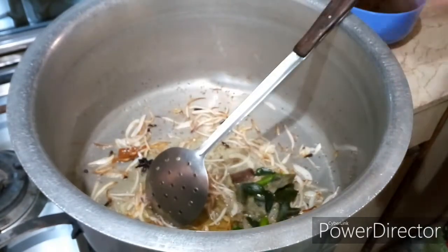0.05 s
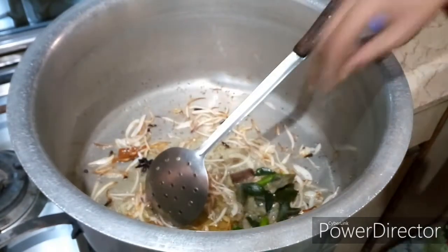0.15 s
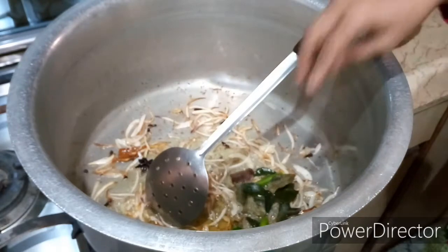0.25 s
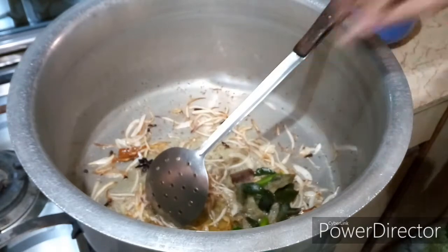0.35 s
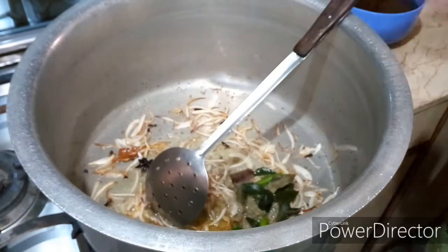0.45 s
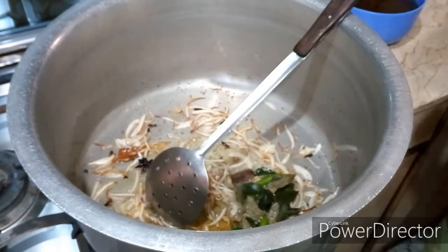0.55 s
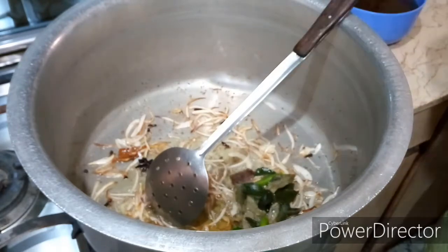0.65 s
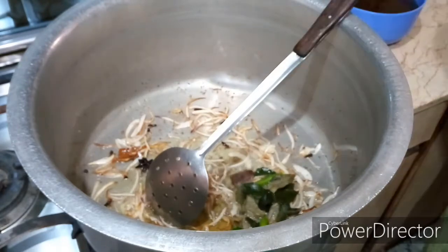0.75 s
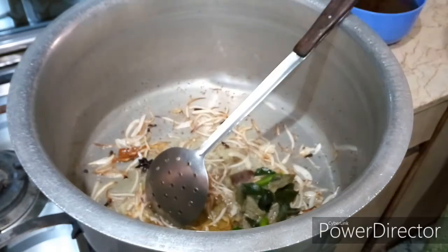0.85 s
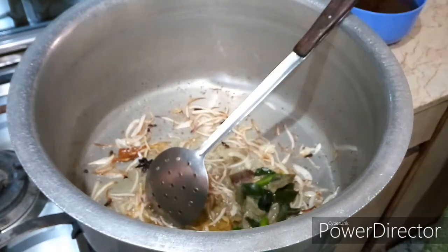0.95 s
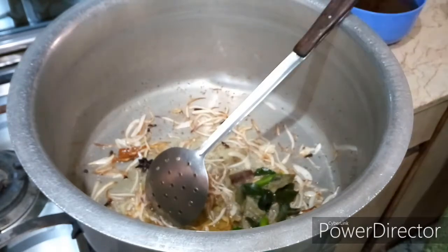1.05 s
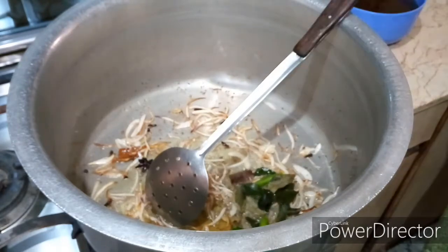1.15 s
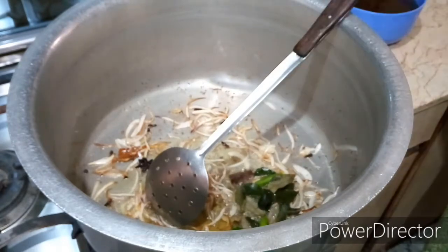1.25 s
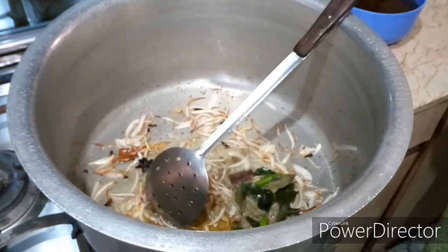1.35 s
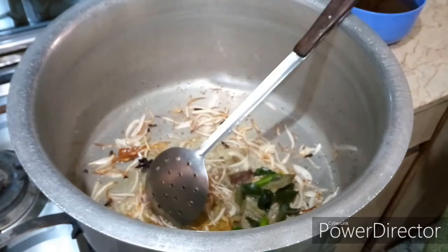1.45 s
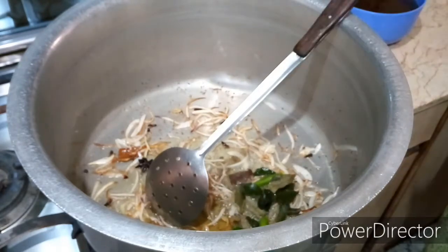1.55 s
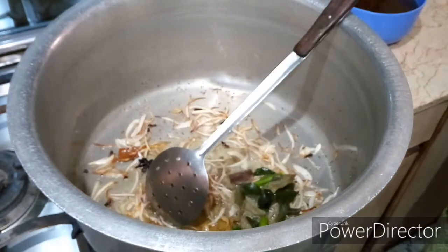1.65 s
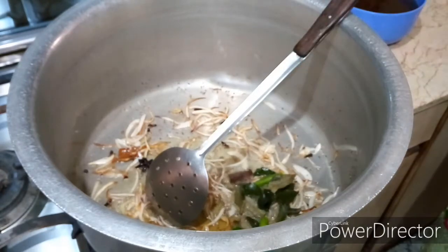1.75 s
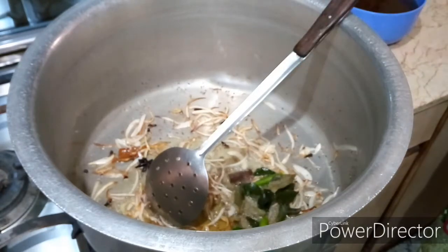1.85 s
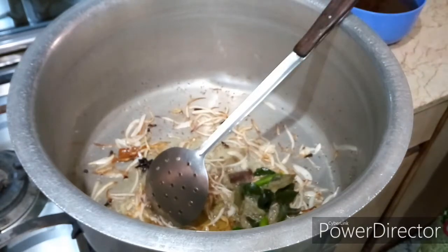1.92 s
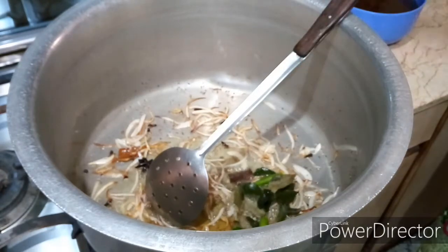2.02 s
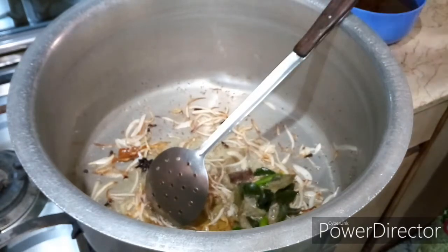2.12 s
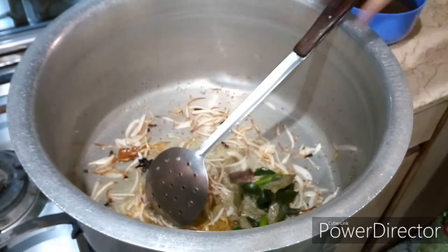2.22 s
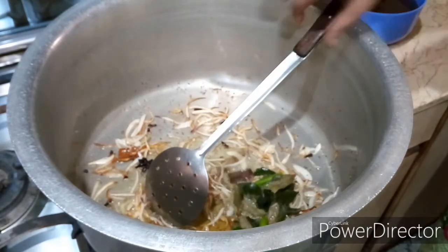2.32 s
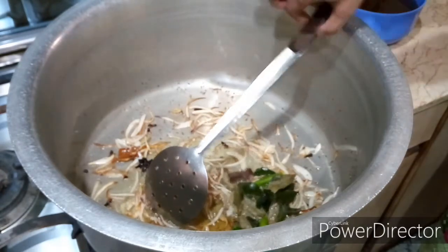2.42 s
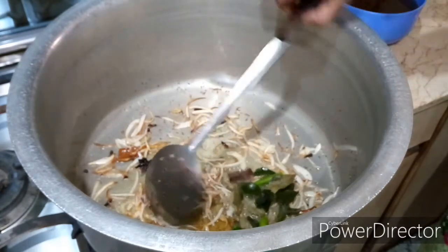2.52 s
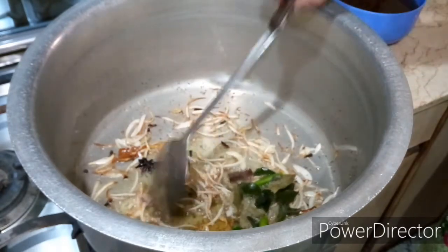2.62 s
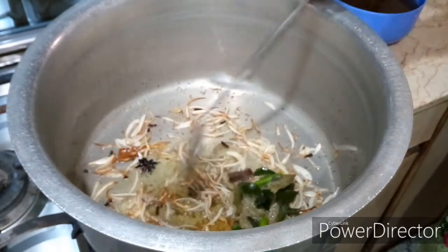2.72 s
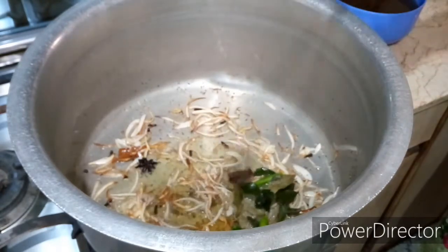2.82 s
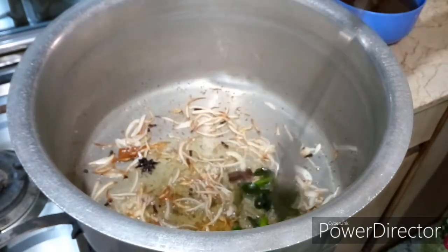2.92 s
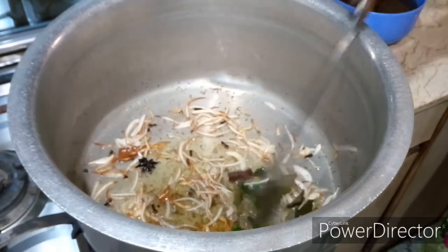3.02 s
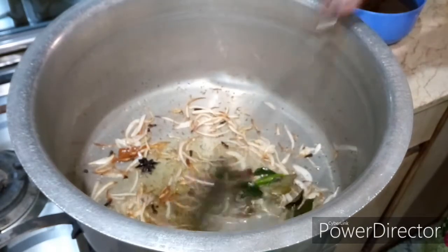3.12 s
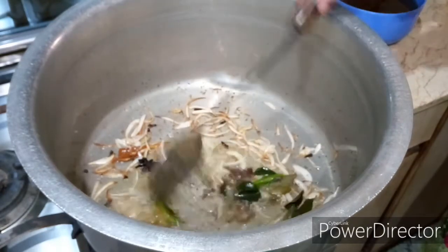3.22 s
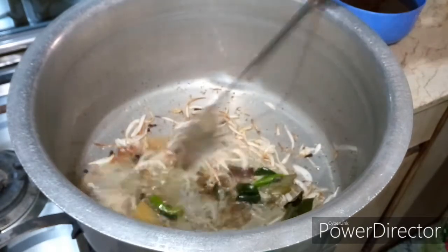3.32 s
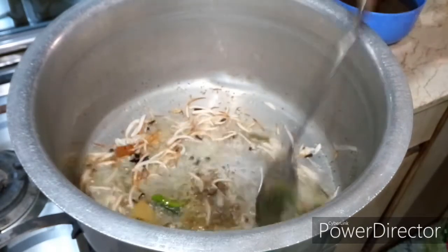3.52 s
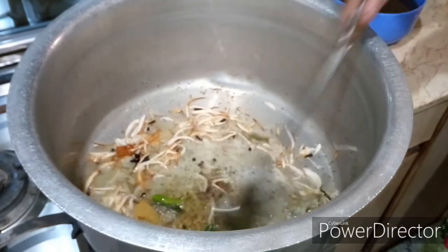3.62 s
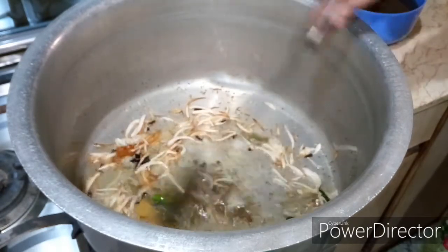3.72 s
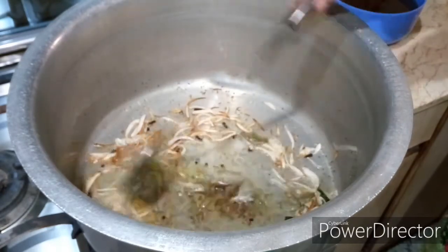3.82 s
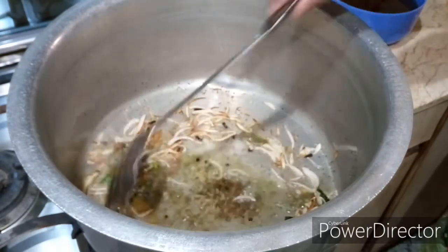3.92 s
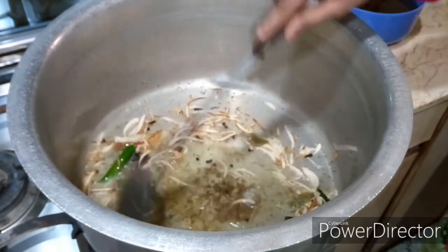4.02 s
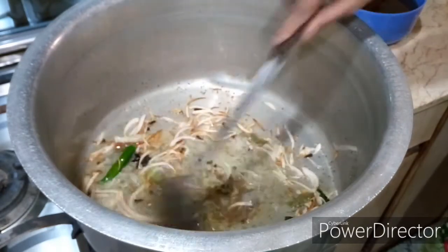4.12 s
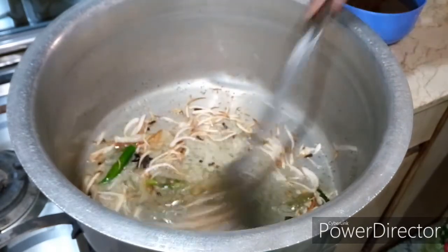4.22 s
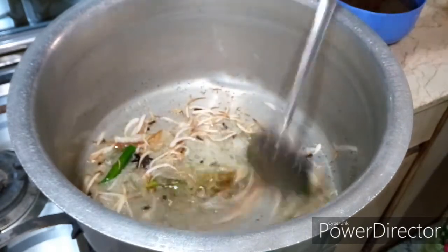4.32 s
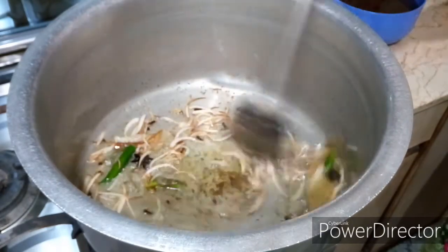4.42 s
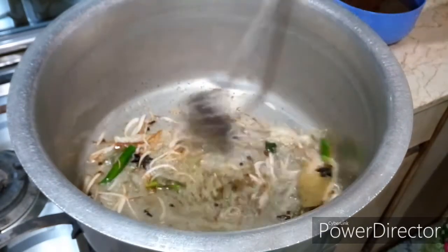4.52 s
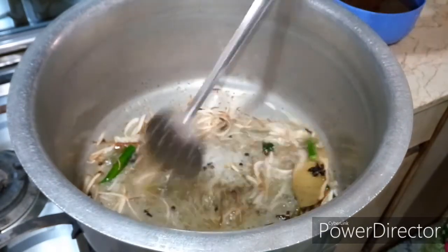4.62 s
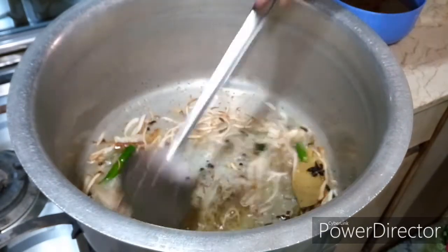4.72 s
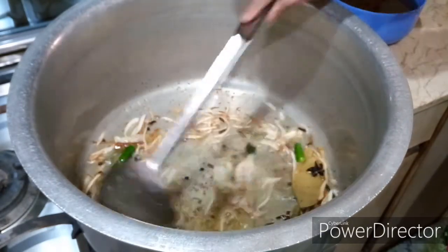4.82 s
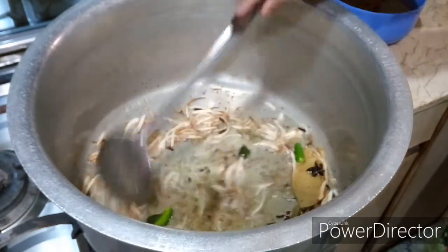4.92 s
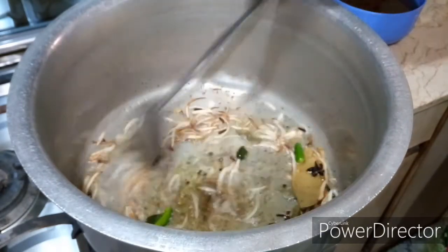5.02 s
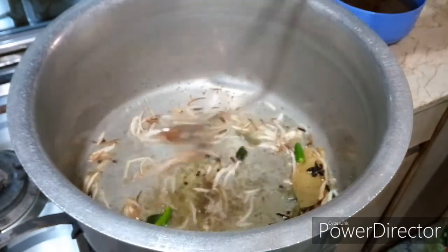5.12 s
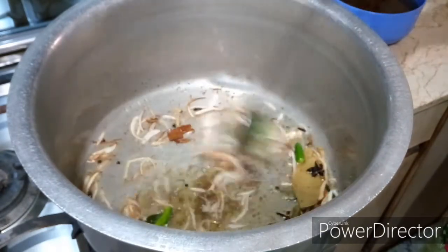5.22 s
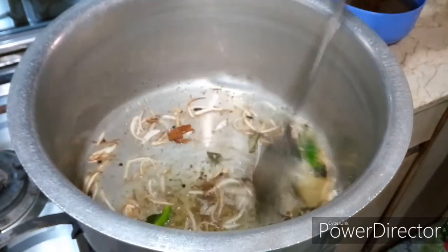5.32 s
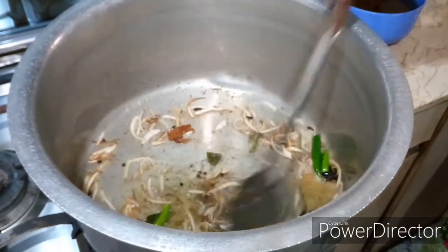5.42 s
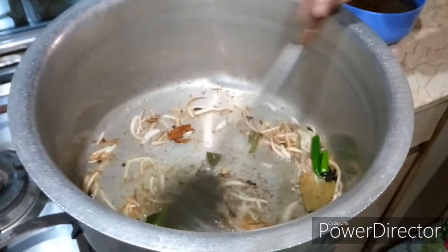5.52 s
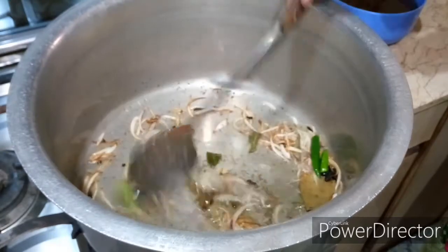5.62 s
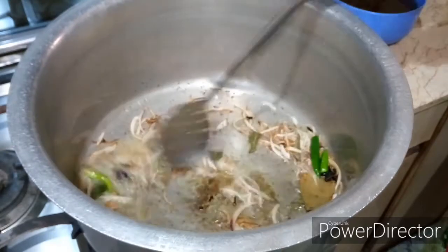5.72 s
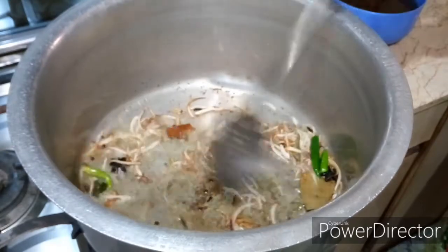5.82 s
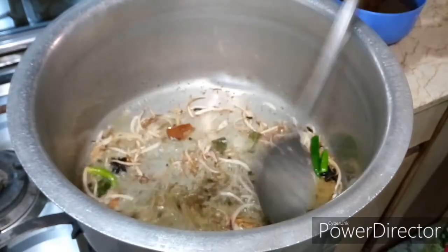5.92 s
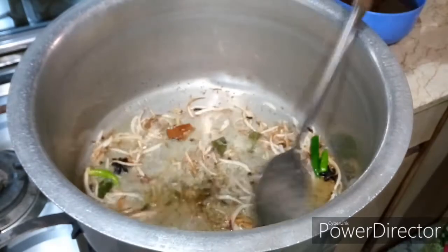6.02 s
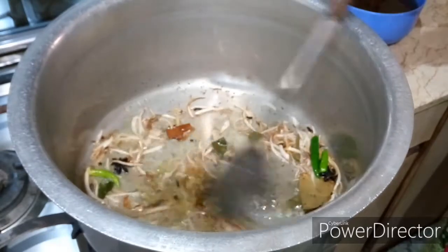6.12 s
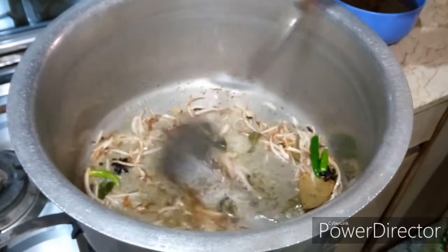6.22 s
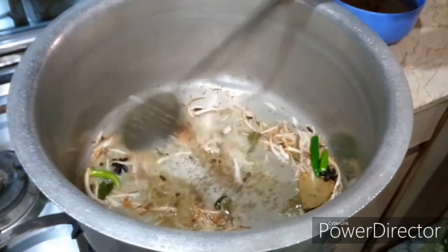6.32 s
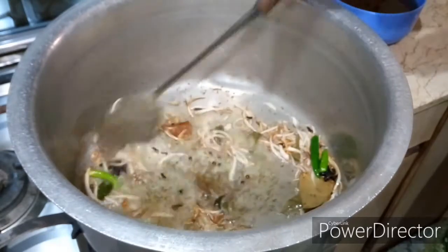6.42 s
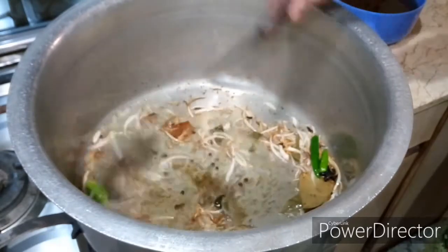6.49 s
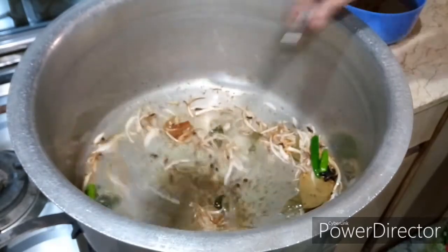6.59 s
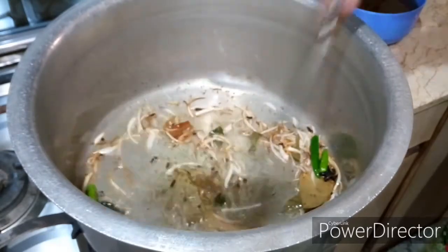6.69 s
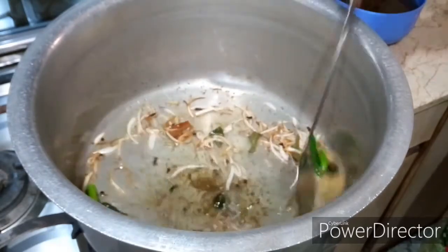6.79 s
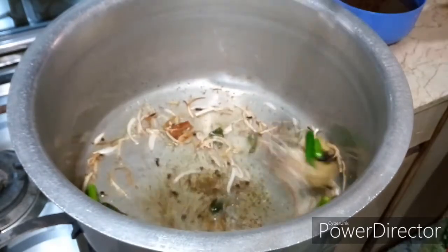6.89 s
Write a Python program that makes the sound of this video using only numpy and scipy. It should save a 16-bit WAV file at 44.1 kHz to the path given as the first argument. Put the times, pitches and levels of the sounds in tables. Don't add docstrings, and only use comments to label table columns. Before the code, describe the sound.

Onions sizzle and spit in hot fat in a wide hollow metal pot while a steel spoon taps, scrapes and knocks its floor.

```python
import sys
import numpy as np
from scipy import signal
from scipy.fft import rfft, irfft, next_fast_len
from scipy.io import wavfile
from scipy.ndimage import uniform_filter1d, map_coordinates

SR = 44100
rng = np.random.default_rng(int(sys.argv[2]) if len(sys.argv) > 2 else 0)


def master(y):
    cut = np.clip(np.atleast_2d(y).T, -1, 1)
    pcm = np.round(cut * 32767)
    wavfile.write(sys.argv[1], SR, pcm.astype(np.int16))


def invert_db(level):
    return 10 ** (np.asarray(level, dtype=float) / 20)


N = 306495

# [t/s, sizzle level/dB]
FRYING_LEVEL = [(0.0, -30), (0.5, -27.5), (0.6, -24), (1.62, -24.5), (1.68, -21), (1.74, -22),
                (2.57, -24.5), (2.73, -21), (2.84, -25), (2.96, -21), (3.0, -28), (3.08, -22),
                (3.27, -22.5), (3.41, -18.5), (4.41, -18), (4.53, -21), (4.61, -18.5), (6.95, -18.5)]


def unit(x):
    return x / np.sqrt(np.mean(x ** 2) + 1e-20)


def along(points, hz):
    f, value = np.transpose(points)
    return np.interp(np.log(hz + 1), np.log(f + 1), value)


def automation(points):
    s, db = np.transpose(points)
    return np.interp(np.arange(N) / SR, s, db)


def wobble(rate):
    knots = rng.standard_normal(int(N * rate / SR) + 4)
    return map_coordinates(knots, [np.arange(N) * rate / SR])


def filtered(x, response):
    m = next_fast_len(len(x) + 8192)
    return irfft(rfft(x, m) * response(np.fft.rfftfreq(m, 1 / SR)), m)[:len(x)]


def peak(f, hz, width_hz):
    return 1j * f * width_hz / (hz * hz - f * f + 1j * f * width_hz)


def tinted(x, spectrum):
    return unit(filtered(x, lambda f: invert_db(along(spectrum, f))))


def add(track, s, sound):
    part = track[round(s * SR):][:len(sound)]
    part += sound[:len(part)]


def pot(f):
    # [f/Hz, width/Hz, lift/dB]
    hollow = [(335, 14, 7.5), (394.7, 13.5, 10.5), (463.5, 6.3, 13), (627, 130, 5.5), (1040, 48, 9.5),
              (1172, 9, 9), (1686, 34, 6), (2010, 30, 6), (2150, 73, 4), (2520, 92, 1), (2780, 41, 2),
              (4320, 59, -13), (5210, 390, -2)]
    return np.prod([1 + (invert_db(db) - 1) * peak(f, hz, width) for hz, width, db in hollow], axis=0)


def in_pot(x, spectrum):
    return unit(filtered(x, lambda f: invert_db(along(spectrum, f)) * pot(f)))


def walls(x, wet_db, t60):
    t = np.arange(SR // 4) / SR
    tail = unit(invert_db(-60 * t / t60) * rng.standard_normal(len(t))) / np.sqrt(len(t))
    return unit(x + invert_db(wet_db) * signal.fftconvolve(x, tail)[:N])


def dulled(blows):
    # [f/Hz, gain/dB]
    loss = [(6100, 0), (7000, -12), (8000, -28), (12000, -40)]
    return filtered(blows, lambda f: invert_db(along(loss, f)))


def backoff_db():
    fry_db = uniform_filter1d(automation(FRYING_LEVEL), SR // 2)
    return -0.21 * (fry_db - fry_db.mean())


def clicks(per_s, spread_db):
    when, size, sign = rng.random((int(per_s * N / SR), 3)).T
    size_db = spread_db * np.minimum(-np.log(size + 1e-9), 4)
    return np.bincount((when * N).astype(int), invert_db(size_db) * np.sign(sign - 0.5), N)


def patches(x, patchy_db):
    z = signal.stft(x, nperseg=256)[2]
    field = uniform_filter1d(rng.standard_normal(z.shape), size=4, axis=0)
    field = uniform_filter1d(field, size=8, axis=1)
    return signal.istft(z * invert_db(patchy_db * unit(field)), nperseg=256)[1][:N]


def bursts(per_s, spread_db, share, patchy_db, lo_hz, hi_hz, cycles):
    m = next_fast_len(N + 8192)
    f = np.fft.rfftfreq(m, 1 / SR)
    total = 0
    for hz in np.geomspace(lo_hz, hi_hz, num=10):
        total = total + rfft(clicks(per_s / 10, spread_db), m) * peak(f, hz, hz / cycles)
    grains = unit(irfft(total, m)[:N])
    mixed = np.sqrt(share) * grains + np.sqrt(1 - share) * rng.standard_normal(N)
    return patches(mixed, patchy_db)


def ring(modes, t, vary_db):
    total = 0
    for hz, db, t60 in modes:
        level_db = db + vary_db * rng.standard_normal()
        total = total + invert_db(level_db - 60 * t / t60) * np.sin(2 * np.pi * hz * t)
    return total


def blip(hz, width_hz, blow_t60, room_db, room_t60, crack_db):
    t = np.arange(int(SR * min(room_t60, 0.26))) / SR
    note = invert_db(-60 * t / blow_t60) * np.sin(2 * np.pi * hz * t) * (1 - np.exp(-t / 0.00024))
    noise = rng.standard_normal((2, len(t)))
    crack = unit(filtered(noise[0], lambda f: peak(f, 1.3 * hz, 1.5 * hz) ** 2))
    crack = crack * invert_db(crack_db - 60 * t / 0.025)
    echo = unit(filtered(noise[1], lambda f: peak(f, hz, width_hz) ** 2))
    echo = invert_db(room_db - 60 * t / room_t60) * echo * (1 - np.exp(-t / 0.006))
    return note / np.max(note) + crack + echo


def sizzle():
    # [f/Hz, level/dB per Hz]
    fizz_spectrum = [(900, -42), (1500, -27), (2500, -12), (3100, -13.5), (3900, -5.5), (4280, -2.5),
                     (4550, -2.5), (5250, 1), (5800, -4), (6500, -11.5), (8000, -35.5), (9000, -37.5),
                     (11700, -50), (19800, -120)]
    # [t/s, peak level/dB, f/Hz]
    large_bubbles = [(0.2774, -6, 4470), (0.4186, -6, 5370), (0.6045, -11, 5300), (0.6524, -9, 4400),
                     (0.7344, 0, 5260), (0.9844, -2, 4730), (1.284, -3, 5330), (1.5718, -1, 5000),
                     (1.6302, -4, 4230), (1.9875, -2, 5490), (2.277, -4, 5120), (2.5351, -16, 5440),
                     (2.5626, -12, 4350), (2.9466, -17, 5340), (3.02, -13, 5200), (3.0435, -9, 4980),
                     (3.2992, -3, 5230), (3.34, -4, 4500), (3.886, -5.5, 4810), (4.301, -1, 5210),
                     (4.437, 0, 4300), (4.796, -9, 4880), (4.8204, -10, 4900), (4.917, -10, 4840),
                     (5.241, -6, 5300), (5.699, -10, 5340), (5.772, -5, 4300), (5.962, 0, 5250),
                     (6.4178, -2, 5400), (6.695, -5, 5150)]
    # [t/s, peak level/dB, fade/s]
    clusters = [(0.0403, -13, 0.009), (0.0897, -18, 0.009), (0.181, -13, 0.009), (0.2379, -10, 0.0099),
                (0.2778, -15, 0.008), (0.3301, -18, 0.009), (0.3621, -15, 0.009), (0.4189, -13, 0.0083),
                (0.6045, -12, 0.0098), (0.6524, -12, 0.009), (0.6853, -15, 0.009), (0.7347, -17, 0.009),
                (0.832, -20, 0.009), (0.8839, -11, 0.009), (0.9592, -9, 0.009), (1.1403, -12, 0.009),
                (1.2351, -9, 0.009), (1.2845, -13, 0.009), (1.3199, -14, 0.009), (1.5145, -21, 0.009),
                (1.5723, -8, 0.0098), (1.6302, -12, 0.0081), (1.9869, -11, 0.0077), (2.1141, -18, 0.009),
                (2.1625, -18, 0.009), (2.2772, -12, 0.009), (2.4708, -9, 0.0097), (2.5621, -18, 0.009),
                (2.593, -12, 0.009), (2.6928, -16, 0.009), (2.9462, -19, 0.009), (3.0435, -8, 0.01),
                (3.1612, -17, 0.0083), (3.2994, -7, 0.009), (3.3398, -13, 0.009), (3.8312, -10, 0.009),
                (3.8861, -10, 0.009), (4.0792, -17, 0.009), (4.3011, -9, 0.009), (4.4383, -18, 0.0082),
                (4.7651, -11, 0.0083), (4.821, -12, 0.009), (4.8574, -3, 0.009), (4.9167, -13, 0.009),
                (5.2405, -12, 0.009), (5.2744, -11, 0.009), (5.7, -15, 0.0081), (5.7718, -18, 0.009),
                (5.8327, -12, 0.009), (5.9619, -9, 0.009), (6.4183, -10, 0.009), (6.6957, -6, 0.0083),
                (6.7506, -11, 0.009)]
    bubbles = bursts(per_s=5000, spread_db=2.0, share=0.27, patchy_db=1.27, lo_hz=2800, hi_hz=7340, cycles=7.5)

    lull_db, pops, flurry = np.zeros((3, N))
    for s, db, hz in large_bubbles:
        add(lull_db, s - 600 / SR, -2.8 * np.sin(np.linspace(0, np.pi, 750)))
        pop = blip(hz, 0.3 * hz, blow_t60=0.02, room_db=-3, room_t60=0.05, crack_db=-5)
        swell = 1 - np.exp(-np.arange(len(pop)) / (0.003 * SR))
        add(pops, s - 0.001, invert_db(db - 7) * pop * swell)
    t = np.arange(2000) / SR
    for s, db, fade_s in clusters:
        add(flurry, s, invert_db(2 * db - 24.5) * (1 - np.exp(-t / 0.003)) * np.exp(-t / fade_s))

    steady_power = invert_db(2 * (automation(FRYING_LEVEL) - 0.13 + lull_db))
    strength = np.sqrt(steady_power + flurry) * invert_db(0.66 * wobble(70) + 0.2 * wobble(13))
    singing = filtered(bubbles, lambda f: 1 + 0.5 * peak(f, 4260, 90))
    return strength * tinted(singing, fizz_spectrum) + dulled(pops)


def spray():
    # [t/s, level/dB]
    spatter = [(0.0, -58), (0.37, -60), (1.74, -58.5), (2.96, -59), (3.27, -55), (3.41, -56), (3.74, -55),
               (5.77, -54), (6.17, -56), (6.5, -56.5), (6.95, -54)]
    # [f/Hz, level/dB per Hz]
    spray_spectrum = [(4400, -30), (7500, -1.5), (8300, -9.5), (12400, -14), (13800, -19), (14300, -24),
                      (15500, -36)]
    # [f/Hz, level/dB per Hz]
    top_lobe = [(12000, -40), (13700, -14), (14200, -1), (14650, -1), (15450, 4), (16000, -4)]
    # [t/s, peak level/dB, lower-band level/dB]
    spits = [(1.6521, -33, -12), (1.684, -31, -13), (1.727, -35, -15), (2.8883, -35, -31),
             (3.3418, -26, -19), (3.3588, -30, -17), (3.7414, -31, -20), (3.8901, -28, -25),
             (4.1909, -27, -19), (4.2318, -34, -18), (4.2537, -35, -12), (4.4184, -39, -15),
             (4.49, -24, -12), (4.8968, -26, -19), (4.9397, -33, -15), (5.0814, -29, -21),
             (5.1442, -29, -16), (5.1771, -37, -13), (5.2654, -33, -16), (5.3487, -27, -18),
             (5.5922, -32, -12), (5.662, -31, -17), (5.7349, -30, -15), (5.7957, -28, -12),
             (5.8376, -35, -13), (6.2342, -39, -11), (6.341, -40, -7), (6.4916, -28, -19),
             (6.5321, -40, -11), (6.8039, -32, -12), (6.9346, -33, -7)]
    spatter_db = automation(spatter)
    spray_db = -52 + spatter_db - spatter_db.mean() + 0.74 * wobble(6.6)
    ticks = unit(clicks(per_s=840, spread_db=9.0))
    fine_ticks = unit(clicks(per_s=900, spread_db=8))
    hiss = rng.standard_normal((2, N))
    body = tinted(0.42 * ticks + hiss[0], spray_spectrum)
    air = tinted(0.25 * ticks + 0.4 * fine_ticks + hiss[1], top_lobe)
    out = invert_db(spray_db - 1.0 + 0.72 * wobble(40)) * body + invert_db(spray_db + 2.0 * wobble(70)) * air

    top, lower = np.zeros((2, N))
    t = np.arange(300) / SR
    for s, db, lower_db in spits:
        add(top, s, invert_db(db + 3 - 60 * t / 0.0071) * rng.standard_normal(len(t)))
        add(lower, s, invert_db(db + lower_db + 20.0 - 60 * t / 0.0047) * rng.standard_normal(len(t)))
    out += filtered(top, lambda f: invert_db(along(top_lobe, f)))
    return out + filtered(lower, lambda f: peak(f, 7400, 4700) ** 2)


def frying(duck):
    return duck * sizzle() + spray()


def murmur():
    # [f/Hz, level/dB per Hz]
    room_spectrum = [(12, -55), (20, -13), (43, -21), (107, -2), (268, -9), (300, -1), (390, -14),
                     (660, -120)]
    level_db = -58 + backoff_db() + 3.3 * wobble(2.655)
    return invert_db(level_db) * tinted(rng.standard_normal(N), room_spectrum)


def dragging(lean):
    # [t/s, peak level/dB, fade/s, tilt toward the spoon's note/dB]
    strokes = [(0.11, -35, 0.048, 0), (0.345, -36, 0.044, -3), (0.58, -36, .05, -3), (0.66, -31, 0.029, -5),
               (0.87, -29.5, 0.059, -4), (1.16, -41, 0.023, 3), (1.22, -38, 0.023, 3),
               (1.31, -31.5, 0.13, -5), (1.57, -28.5, 0.082, 2), (1.76, -27, 0.094, -3),
               (2.59, -31, 0.12, 0), (2.71, -28, 0.028, -2), (2.96, -42, 0.044, 2), (3.14, -31.5, 0.07, 3),
               (3.62, -28.5, 0.041, -1), (3.7, -25, 0.089, 3), (3.87, -27, 0.046, 6), (4.01, -32, .05, 1),
               (4.15, -25, 0.15, 8), (4.32, -28, 0.071, -3), (4.63, -27.5, 0.091, 0),
               (4.97, -25.5, 0.034, 3), (5.13, -32, 0.13, 14), (5.24, -30, 0.034, -1),
               (5.38, -29.5, 0.055, 0), (5.71, -26.5, 0.03, -4), (5.995, -31, .09, 6),
               (6.15, -24, 0.063, 5), (6.37, -26.5, 0.05, -7), (6.48, -31, 0.7, 6)]
    grip_s, rest_db = 0.011, -36.5
    t = np.arange(0, N + 64, 64) / SR
    s, db, fade_s, tilt_db = (column[:, None] for column in np.transpose(strokes))
    rise = np.exp(-((s - t) / grip_s) ** 2)
    fall = np.exp(-((t - s) / fade_s) ** 2)
    shape = np.where(t < s, rise, fall)
    power = invert_db(2 * rest_db - 4.6 * lean) + np.sum(invert_db(2 * db + lean * tilt_db) * shape, axis=0)
    return np.interp(np.arange(N) / SR, t, 10 * np.log10(power))


def stirring():
    # [f/Hz, level/dB per Hz]
    scrape_spectrum = [(650, -12), (1100, -13), (2050, -3), (2300, -1.5), (2700, 1.5), (3030, -4.5),
                       (3600, 2), (4680, -30), (7920, -120)]
    # [f/Hz, level/dB per Hz]
    hum_spectrum = [(120, -37), (200, -6.5), (393, -7.5), (527, -11.5), (662, -0.5), (902, -4), (1400, 0.5),
                    (1820, -6), (3080, -120)]
    floor_db, spoon_db = dragging(lean=-1.3), dragging(lean=1)
    drag = wobble(22)
    chatter = bursts(per_s=900, spread_db=2.5, share=0.3, patchy_db=2.5, lo_hz=1160, hi_hz=3300, cycles=4.5)
    rasp = walls(in_pot(chatter, scrape_spectrum), wet_db=-3.5, t60=0.11)
    floor = unit(filtered(rasp, lambda f: 0.42 + peak(f, 1900, 1050)))
    spoon = unit(filtered(rasp, lambda f: peak(f, 2740, 470)))
    scrape = invert_db(0.23 * drag) * (invert_db(floor_db - 6.5) * floor + invert_db(spoon_db - 11.0) * spoon)

    swing_db = uniform_filter1d(floor_db - floor_db.mean(), int(0.017 * SR) + 1)
    hum_db = -43 + backoff_db() + 0.57 * swing_db + 0.68 * drag + 0.38 * wobble(15)
    hum = in_pot(patches(rng.standard_normal(N), patchy_db=3.0), hum_spectrum)
    return scrape + invert_db(hum_db) * hum


def taps():
    # [t/s, peak level/dB, f/Hz, room level/dB]
    small_taps = [(0.029, -22, 1025, 0), (0.085, -19, 2280, 3.5), (0.17, -33, 1040, -11),
                  (0.26, -20.5, 710, -0.5), (0.339, -19.5, 2150, 3.5), (0.519, -26, 2150, -17),
                  (0.567, -16, 2310, -9), (0.765, -35, 2570, -5), (0.85, -19.5, 1040, 0.5),
                  (0.996, -13, 2660, -1), (1.046, -17.5, 740, -0.5), (1.147, -13, 2800, -7),
                  (1.219, -12.5, 2740, -12), (1.31, -17, 2080, -1), (1.376, -16, 2600, -22),
                  (1.566, -16, 2150, -3), (2.025, -17.5, 2150, 0.5), (2.03, -25.5, 1150, 0),
                  (2.1, -27, 1300, 3.5), (2.177, -27, 1130, -1),
                  (2.592, -17, 1670, -6), (2.653, -15, 1670, -4), (2.698, -11, 2400, 0.5),
                  (2.947, -16, 2150, -20), (3.126, -9.5, 2780, -6), (3.708, -24, 2750, 9),
                  (3.925, -11, 2700, -2), (4.141, -9, 2680, -5.5), (4.222, -10, 2780, -17),
                  (4.309, -13, 2720, -7), (4.456, -20.5, 677, -4), (4.506, -12.5, 2670, -24),
                  (5.229, -11.5, 1840, -22), (5.683, -16.5, 1760, -10), (5.985, -13.5, 2770, 2.5),
                  (6.365, -14.5, 1910, -14), (6.06, -11, 2750, -3), (6.476, -9, 2760, -7),
                  (6.44, -17.5, 2010, -3)]
    # [t/s, peak level/dB, f/Hz, room level/dB]
    floor_nicks = [(2.242, -20, 3010, -8), (2.3136, -19, 3430, -8), (2.4553, -24, 2720, -8),
                   (2.5636, -21, 3300, -12), (3.031, -19, 3570, -5), (3.378, -21, 2900, -10),
                   (3.455, -24, 3250, -10), (3.5242, -12.5, 3300, -4), (3.686, -16, 3450, -6),
                   (3.7477, -20, 2720, -10), (3.7943, -20, 2710, -10), (3.8603, -21, 2800, -13),
                   (4.0053, -12.5, 3500, -7), (4.2472, -15, 3410, -14), (4.574, -14, 2830, -14),
                   (4.6238, -18, 2590, -10), (4.9304, -13.5, 3410, -10), (5.123, -15, 2700, -12),
                   (5.1704, -18, 2660, -10), (5.254, -24, 1980, -7), (5.6351, -19, 3410, -10),
                   (5.8122, -21, 3470, -12), (6.1414, -15, 2820, -8), (6.1887, -17, 2780, -5),
                   (6.317, -16, 3430, -10), (6.5415, -11.5, 3530, -8), (6.623, -16, 2550, -8)]
    out = np.zeros(N)
    for s, db, hz, room_db in small_taps:
        tap = blip(hz, 0.5 * hz, blow_t60=0.04, room_db=room_db - 5, room_t60=0.35, crack_db=1)
        add(out, s, invert_db(db - 6) * tap)
    for s, db, hz, room_db in floor_nicks:
        nick = blip(hz, 0.25 * hz, blow_t60=0.025, room_db=room_db - 4, room_t60=0.2, crack_db=-3)
        add(out, s, invert_db(db + 0.3) * nick)
    return invert_db(-3.5) * filtered(out, lambda f: pot(f) ** 0.6)


def knocks():
    # [t/s, peak level/dB, f/Hz, edge level/dB, boom level/dB]
    floor_knocks = [(0.559, -35.5, 348, 9, -34), (0.636, -37, 396, 9, -27), (3.062, -26, 330, 0, -12),
                    (3.101, -29.5, 384, 3, -15), (3.427, -13.5, 398.4, -3, -37),
                    (3.744, -29, 478, 3.5, -32), (4.192, -25, 240, -3, -21.5), (4.239, -41, 405, -7, -18),
                    (4.457, -29.5, 404, 10.5, -31), (5.565, -33, 467, -5, -28), (5.806, -41, 410, 9, -24),
                    (6.185, -25, 389, -5, -19), (6.225, -28, 399, 0, -20)]
    # [f/Hz, level/dB, t60/s]
    low_modes = [(240, -11, 0.12), (318, -7.5, 0.54), (394, -7.5, 0.49), (482, -15.5, 0.47)]
    # [f/Hz, level/dB, t60/s]
    upper_modes = [(658, 1.5, 0.16), (816, -7, 0.11), (1030, -9, 0.34), (1162, -9, 0.069), (1597, -8, 0.11)]
    # [f/Hz, level/dB, t60/s]
    stove_modes = [(75.4, -8.5, 0.5), (83.6, -0.5, 0.48), (92, -6, .35), (101.6, -5, 0.45), (125, -9, .25),
                   (153, -8.5, 0.31), (195, -5, 0.24)]
    out, booms = np.zeros((2, N))
    t = np.arange(SR // 2) / SR
    soft = 1 - np.exp(-t / 0.002)
    late = 1 - np.exp(-(t / 0.02) ** 2)
    for s, db, hz, edge_db, boom_db in floor_knocks:
        thud = blip(hz, 0.5 * hz, blow_t60=0.2, room_db=-12, room_t60=0.55, crack_db=-2.5)
        edge_click = blip(1000, 1400, blow_t60=0.013, room_db=-6.5, room_t60=0.31, crack_db=2.0)
        bell = invert_db(-8.0) * ring(low_modes, t, vary_db=4.0)
        bell = bell + invert_db(edge_db - 12) * ring(upper_modes, t, vary_db=2.5)
        add(out, s, invert_db(db - 7) * thud)
        add(out, s, invert_db(db + edge_db - 8.0) * edge_click)
        add(out, s, invert_db(db) * soft * bell)
        add(booms, s, invert_db(db + boom_db + 2.5) * late * ring(stove_modes, t, vary_db=3.5))
    return filtered(out, lambda f: (1j * f / (170 + 1j * f)) ** 2) + booms


def clinks():
    # [t/s, ring level/dB, clack level/dB]
    landings = [
        (1.6838, -9.5, -8.5),
        (1.7262, -14, -12.5),
        (1.751, -36, -24),
        (1.765, -32, -21),
    ]
    # [f/Hz, level/dB, t60/s]; close pairs beat
    steel_modes = [(3230, -16, .1), (3330, -17, .08), (4870, -7, .03), (5932, -4, .13), (5975, -8, .06),
                   (6100, -8, .02), (1604, -20, .14), (1916, -16, .05)]
    out = np.zeros(N)
    t = np.arange(SR // 4) / SR
    for s, ring_db, clack_db in landings:
        steel = ring(steel_modes, t, vary_db=0) * (1 - np.exp(-t / 0.0012))
        shimmer = blip(5940, 200, blow_t60=0.02, room_db=0, room_t60=0.16, crack_db=-30)
        rattle = blip(3100, 1100, blow_t60=0.02, room_db=-2, room_t60=0.3, crack_db=-10)
        clack = blip(1540, 1300, blow_t60=0.026, room_db=-12, room_t60=0.33, crack_db=-12)
        add(out, s, invert_db(ring_db - 0.5) * steel)
        add(out, s, invert_db(ring_db - 12) * shimmer)
        add(out, s, invert_db(clack_db - 13) * rattle)
        add(out, s, invert_db(clack_db) * clack)
    return out


def scene():
    clang = clinks()
    duck = 1 / (1 + 17 * uniform_filter1d(np.abs(clang), size=1500))
    blows = dulled(taps() + knocks() + clang)
    return (frying(duck) + murmur() + stirring() + blows)[None]


def band_limit(x):
    return signal.sosfilt(signal.butter(12, 16850, fs=SR, output="sos"), x)


def record(dry):
    squeezed = dry[0] / (1 + np.abs(dry[0] / 0.75) ** 4) ** (1 / 4)
    mix = filtered(squeezed, lambda f: f < 15500)[None]
    return band_limit(mix)


dry = scene()
out = record(dry)
master(out)
```